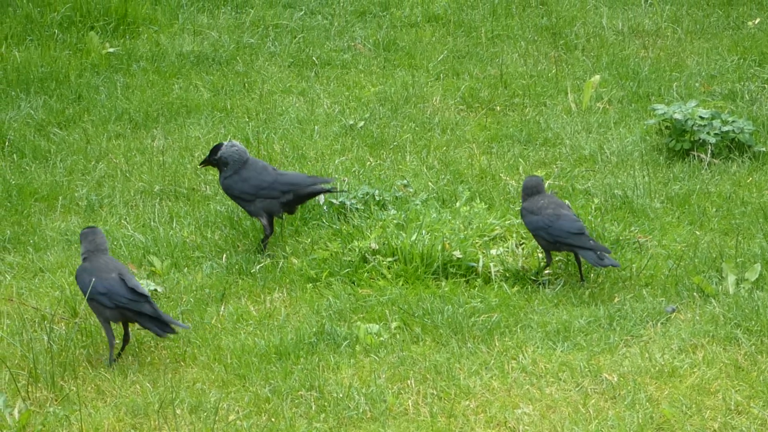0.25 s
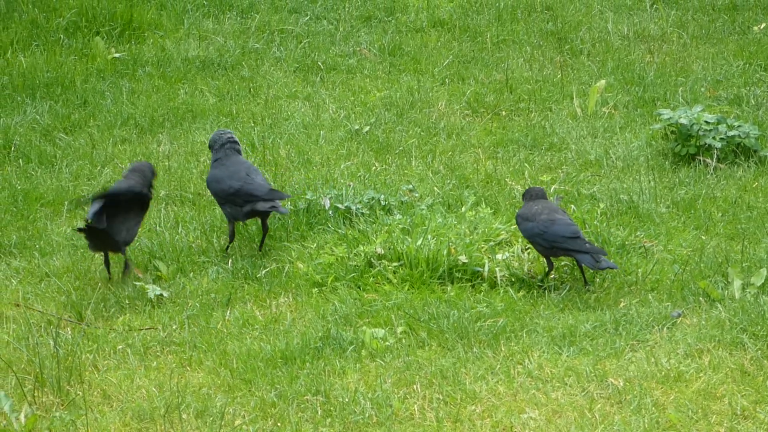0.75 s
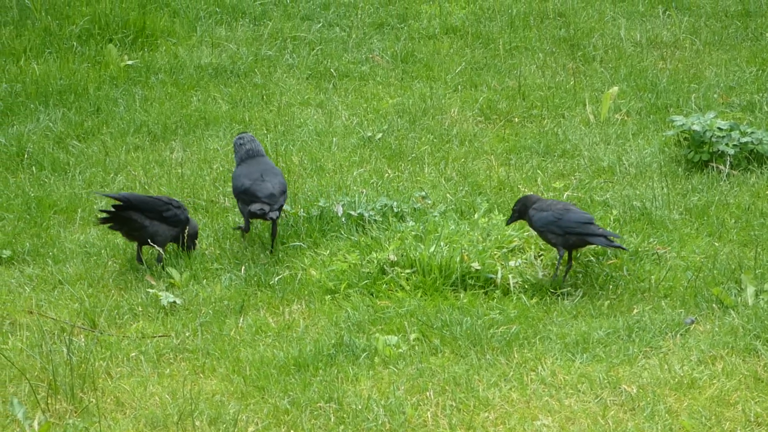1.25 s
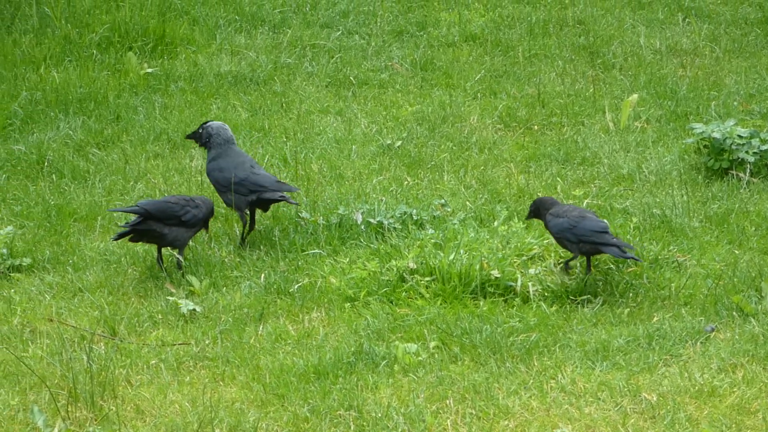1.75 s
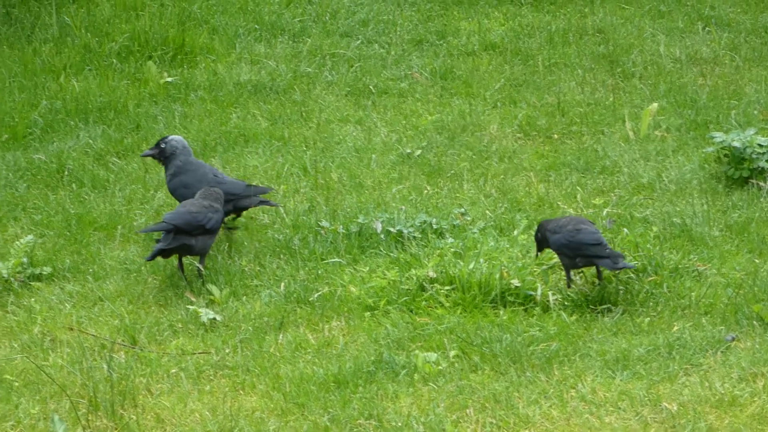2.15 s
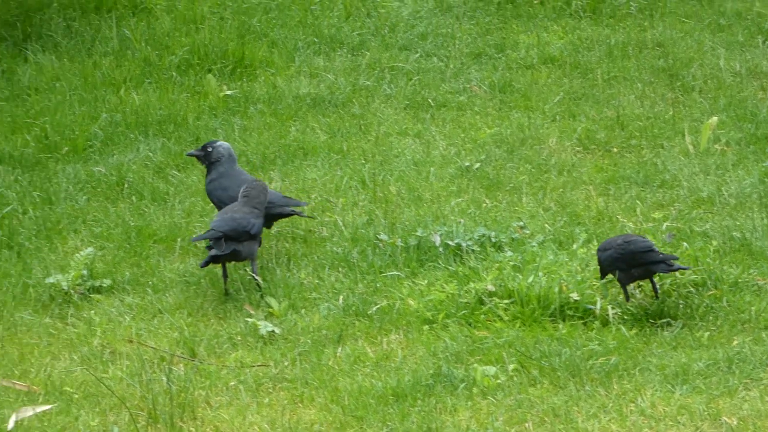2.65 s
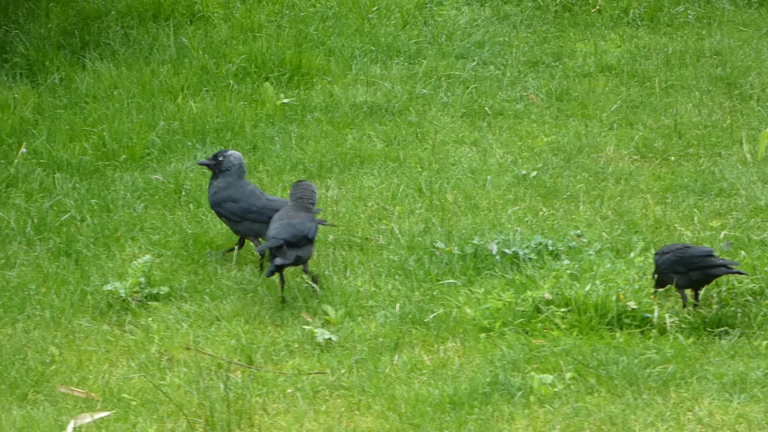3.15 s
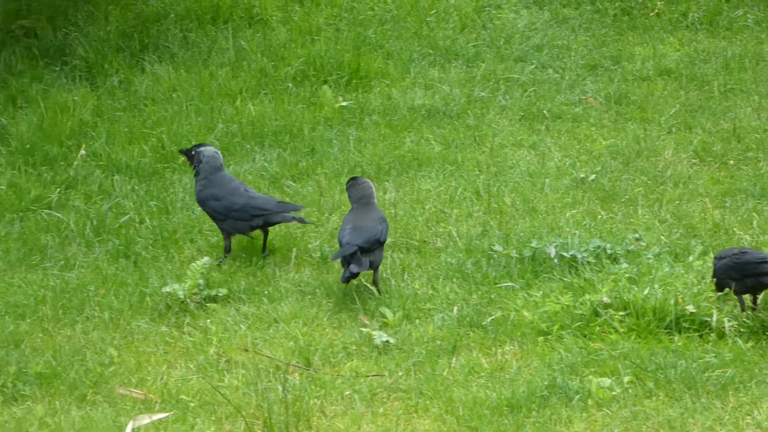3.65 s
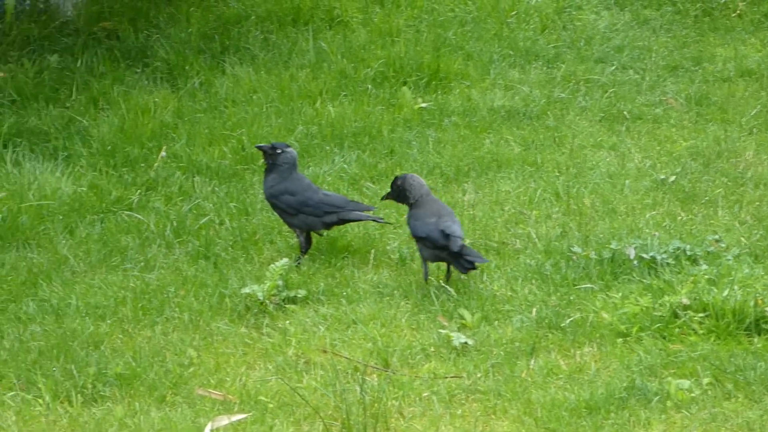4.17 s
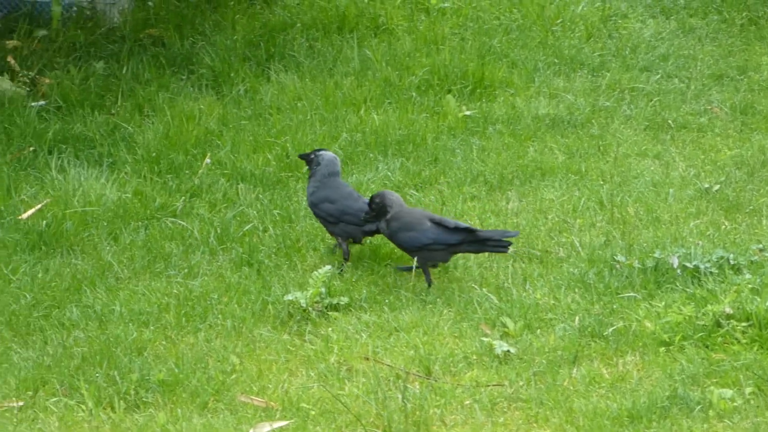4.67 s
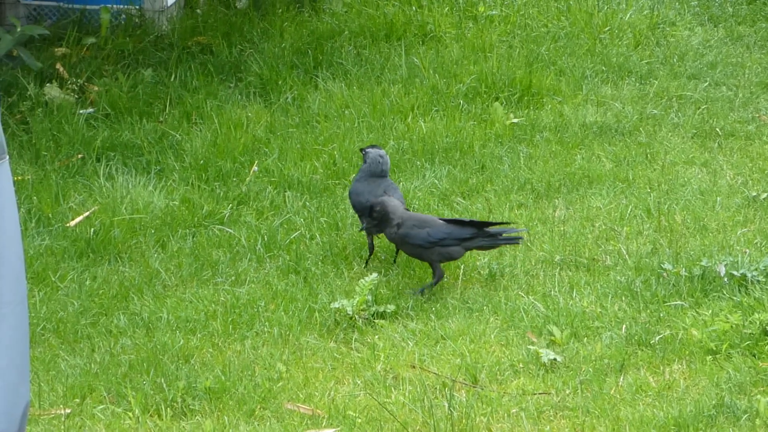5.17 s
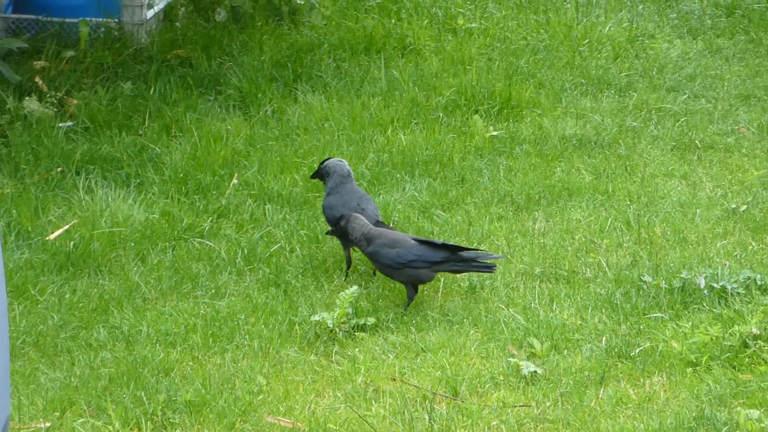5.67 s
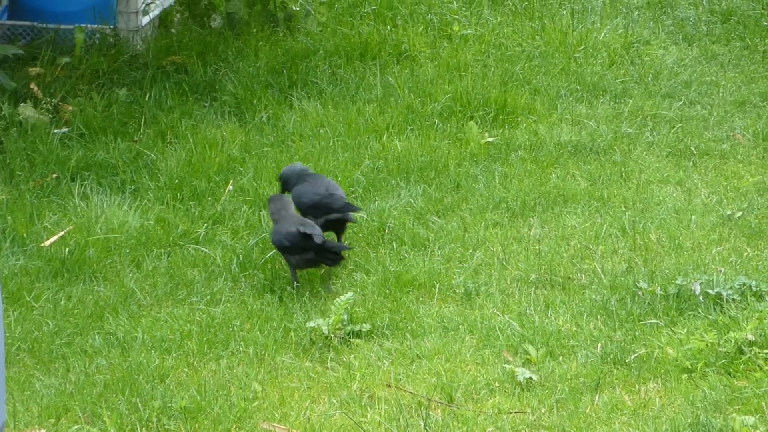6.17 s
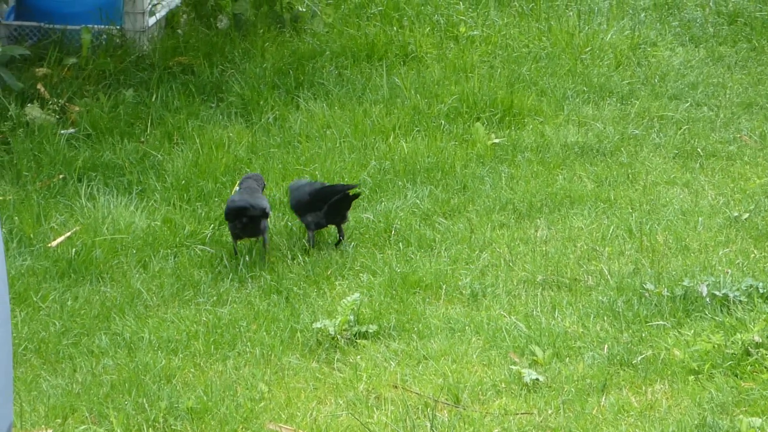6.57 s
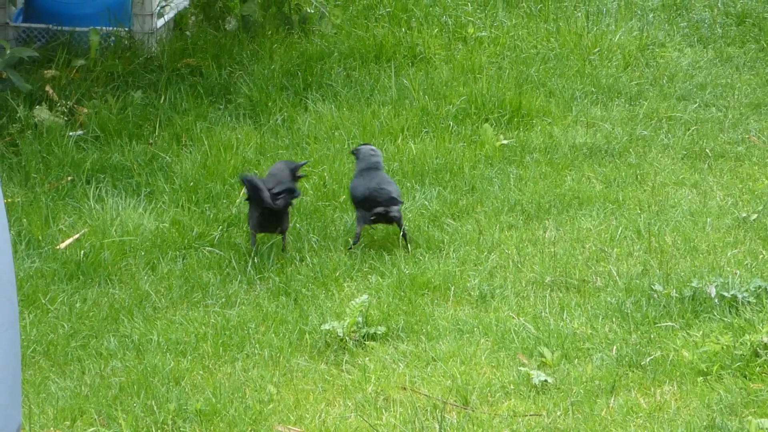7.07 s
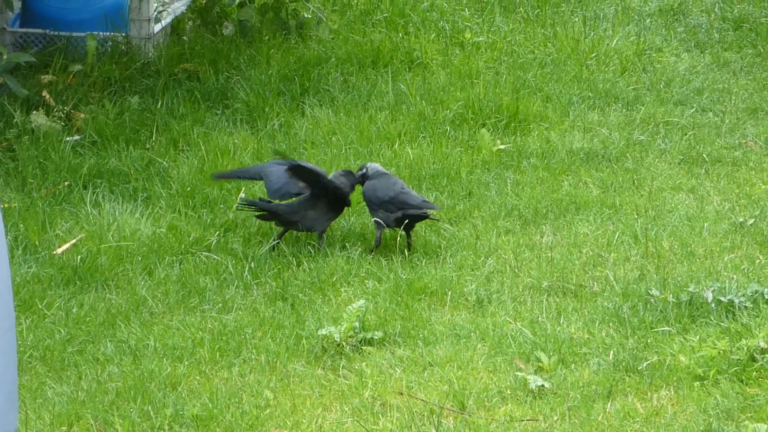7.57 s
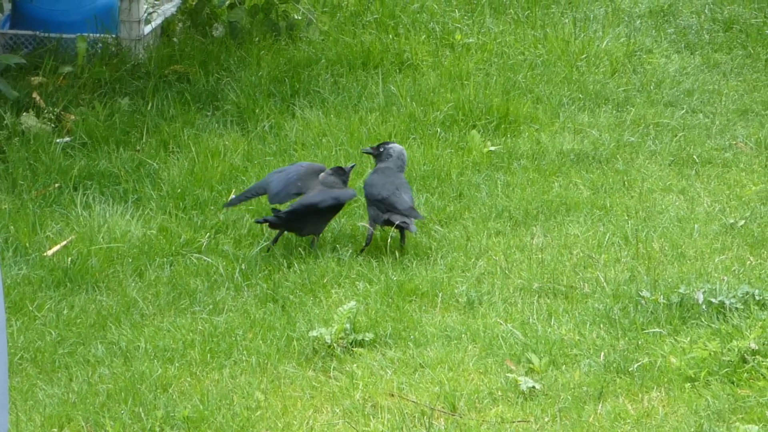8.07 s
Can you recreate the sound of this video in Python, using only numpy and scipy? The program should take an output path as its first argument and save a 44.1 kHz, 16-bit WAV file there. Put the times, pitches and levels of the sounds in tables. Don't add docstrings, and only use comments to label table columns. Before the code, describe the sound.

A garden with faint, slowly swelling far traffic and light hiss throughout. A soft bill snap at 0.1 s and two tiny nasal caws at 0.2 and 0.4 lead into a hidden crow-like bird's chattering phrase from about 0.6: bright pips with quick nasal downward slides, whistles and raspy squeaks, the pip-and-slide pattern returning, then a falling peep and churr. It sounds distant and echoey. A louder snap comes at 1.5 and a clear caw at 1.9; the phrase repeats at 2.1, 3.9 and 5.9. Caws at 3.5 and 3.65 surround another snap; more come at 5.3 and 5.8, with a dull knock and click close by at 5.5. At 7.15 and 7.55 a nearer young jackdaw, slightly right, gives two loud begging calls, breaking and sliding down over an octave, the first with a stronger held start. A weak caw at 8.1 and faint knock at 8.3 finish.

```python
import sys
import numpy as np
from scipy import signal
from scipy.fft import rfft, irfft, next_fast_len
from scipy.io import wavfile

SR = 44100
rng = np.random.default_rng(int(sys.argv[2]) if len(sys.argv) > 2 else 0)


def how_loud(loudness_db):
    steps = np.asarray(loudness_db, float) / 20
    return 10 ** steps


def generate_wav(signal):
    frames = np.transpose(np.atleast_2d(signal))
    scaled = np.clip(frames, -1, 1) * 32767
    pcm = np.round(scaled).astype(np.int16)
    wavfile.write(sys.argv[1], SR, pcm)


N = 367353
TOP_HZ = 15750

# t/s, time stretch, level/dB
PHRASES = [
    (.588, 0.98, -1.5),
    (2.073, 1, -0.56),
    (3.911, .998, -0.87),
    (5.929, 0.99, -0.6),
]
CHEW_STARTS_S = (.152, .765)
# t/s from phrase start, length/s, first f/Hz, last f/Hz, level/dB
WHISTLES = [
    (0.602, 0.042, 3720, 3860, -31),
    (.682, 0.073, 4050, 4150, -39),
    (.664, 0.029, 6650, 6500, -39.5),
    (.479, .032, 3900, 3600, -36),
    (.642, .04, 3600, 3800, -38.5),
]
RASPS = [
    (.001, 0.04, 3050, 2720, -53),
    (0.4804, 0.028, 6700, 6500, -37.5),
    (.49, 0.042, 7300, 6900, -50.5),
    (.481, .068, 10000, 9800, -58),
]
PEEPS = [
    (1.086, 0.061, 2143, 1250, -38.5),
]
CHURRS = [
    (1.112, 0.2, 2293, 584.6, -35),
]
FALLS = [
    (.5, 0.056, 2595, 1153, -43.5),
    (1.12, 0.039, 2130, 1282, -42),
]
TONES = [
    (.055, .066, 3925, 3765, -40),
]
# t/s from chew start, length/s, first f/Hz, last f/Hz, level/dB
CHEW_PIPS = [
    (0.00099, 0.025, 3740, 3950, -28),
    (.026, 0.028, 4000, 3850, -39),
    (.007, 0.028, 3500, 2500, -45),
]
CHEW_SLIDES = [
    (.019, .14, 1270, 725.4, -37.5),
]
CHEW_NASALS = [
    (.195, 0.1084, 559, 593.5, -42.5),
]
CHEW_TAILS = [
    (.085, 0.066, 799, 713, -57.5),
]
# f/Hz, width/Hz, level/dB
SINGER_THROAT = [(710, 130, -7), (1300, 78, 0.5), (3380, 1650, 0.5), (3530, 2400, 6.5), (6300, 600, -16),
                 (9500, 780, -17)]
NASAL_THROAT = [(1180, 750, -10), (2350, 960, -17.5), (3123, 500, 6), (3620, 300, -6), (4020, 190, 4),
                (5400, 1500, -18), (9160, 2400, -20)]
CHURR_THROAT = [(1250, 130, -10), (2060, 850, -14), (3460, 1120, 4.5), (4670, 1400, -2), (5800, 100, -21),
                (10000, 930, -13)]
PEEP_THROAT = [(2100, 700, -3), (4500, 670, 2.5), (6690, 740, 2), (8970, 730, -7.5)]
WHISTLE = dict(slope_db=-18, rough=.05, slide_rough=0.044, glide_s=0.0099,
               attack_s=0.007, sag_db_s=38, release_s=0.021)
RASP = dict(slope_db=-10, rough=0.299, slide_rough=0.018, glide_s=.015,
            attack_s=0.0056, sag_db_s=150, release_s=0.021)
PEEP = dict(slope_db=0.5, rough=.045, slide_rough=.01, glide_s=.052, hesitation=4.5, droop=0,
            attack_s=0.017, sag_db_s=9, release_s=0.027)
CHURR = dict(slope_db=-2.5, rough=0.057, slide_rough=0.142, glide_s=.036,
             attack_s=0.027, sag_db_s=44, release_s=0.0666)
FALL = dict(slope_db=-4.5, rough=0.14, slide_rough=0.11, glide_s=.02,
            attack_s=.014, sag_db_s=20, release_s=0.019)
TONE = dict(slope_db=-17, rough=.032, slide_rough=.02, glide_s=.014,
            attack_s=0.016, sag_db_s=-15, release_s=0.028)
PIP = dict(slope_db=-12, rough=0.09, slide_rough=0.019, glide_s=0.00802,
           attack_s=0.009, sag_db_s=61, release_s=.012)
SLIDE = dict(slope_db=-1, rough=0.078, slide_rough=.06, glide_s=.05, hesitation=3.2,
             attack_s=.012, sag_db_s=117, release_s=0.0091)
NASAL = dict(slope_db=0, rough=0.057, slide_rough=0.014, glide_s=0.0161, droop=0.00214,
             attack_s=0.014, sag_db_s=0, release_s=0.043)
TAIL = dict(slope_db=-13, rough=0.056, slide_rough=.04, glide_s=.015,
            attack_s=0.017, sag_db_s=5, release_s=0.013)


def phrases():
    track = np.zeros(N)
    once = [(WHISTLES, WHISTLE, SINGER_THROAT), (RASPS, RASP, SINGER_THROAT), (PEEPS, PEEP, PEEP_THROAT),
            (CHURRS, CHURR, CHURR_THROAT), (FALLS, FALL, SINGER_THROAT), (TONES, TONE, SINGER_THROAT)]
    chew = [(CHEW_PIPS, PIP, SINGER_THROAT), (CHEW_SLIDES, SLIDE, SINGER_THROAT),
            (CHEW_NASALS, NASAL, NASAL_THROAT), (CHEW_TAILS, TAIL, SINGER_THROAT)]
    for start, stretch, db in PHRASES:
        for shift, parts in [(0, once), (CHEW_STARTS_S[0], chew), (CHEW_STARTS_S[1], chew)]:
            for notes, voice, throat in parts:
                for s, *row in notes:
                    add_voice(track, start + stretch * (shift + s), note(*row, **voice), throat, db)
    return track


# t/s, length/s, f/Hz, starts off pitch by %, level/dB
CAWS = [
    (0.221, 0.054, 466, 5, -53.5),
    (0.417, 0.04, 463, 7.5, -54.5),
    (1.9, 0.1644, 578, -9, -38.5),
    (3.473, .1, 438, -6.5, -45.5),
    (3.654, .215, 549.7, -8, -40.5),
    (5.333, 0.094, 419, -4.5, -47.5),
    (5.789, 0.066, 471, 7.5, -50.5),
    (8.106, 0.094, 386.6, 7, -50),
]
# f/Hz, width/Hz, level/dB
CAW_THROAT = [(1260, 160, -5), (1590, 700, -4), (2820, 920, 6), (3890, 1040, 2.5), (5760, 1200, -20),
              (9500, 2000, -19)]


def lone_caws():
    track = np.zeros(N)
    for s, length, hz, off, db in CAWS:
        slope_db = -2.6 + 0.22 * (db + 44)
        rows = note(length, hz * (1 + off / 100), hz, db, slope_db, rough=.06, slide_rough=0,
                    glide_s=.16 * length, droop=0.00345,
                    attack_s=0.22 * length, sag_db_s=19, release_s=0.506 * length)
        add_voice(track, s, rows, CAW_THROAT)
    return track


# t/s, length/s, level/dB, held note over it/dB
BEGS = [
    (7.161, 0.26, -31, 4.5),
    (7.555, 0.21, -32, -2),
]
# t/s from call start, f/Hz
BEG_PITCH = [
    (0, 1372),
    (.037, 1342),
    (.042, 1160),
    (.076, 993),
    (.092, 768.4),
    (.12, 680.6),
    (.148, 567),
    (.175, 541),
    (.27, 496),
]
# f/Hz, width/Hz, level/dB
YOUNG_THROAT = [(1240, 340, -5), (2070, 470, 9.5), (2560, 700, 8), (4700, 560, -5.5), (5970, 1040, -6),
                (8000, 3000, -17)]


def youngster():
    break_s, break_depth_db, break_heals_s = .041, 6.5, 0.0086
    track = np.zeros(N)
    for s, length, db, held_db in BEGS:
        t = np.arange(0, length, .001)
        push_db = effort(t, length, attack_s=0.035, sag_db_s=19, release_s=0.074)
        held = np.clip((break_s - t) / .003, 0, 1)
        healing = np.exp(-np.abs(t - break_s) / break_heals_s)
        break_db = held * held_db - (1 - held) * break_depth_db * healing
        slope_db = 3.5 + 0.32 * push_db - (4 - 0.53 * held_db) * held
        hz = np.interp(t, *np.transpose(BEG_PITCH))
        rough = .05 + .08 * t
        rows = np.transpose([t, hz, db + push_db + break_db, slope_db, rough])
        add_voice(track, s, rows, YOUNG_THROAT)
    return track


# t/s, level/dB, low knock level/dB
SNAPS = [
    (0.1183, -49, 3),
    (1.5062, -40.5, 15.5),
    (3.5865, -43, 12.5),
]
# f/Hz, width/Hz, level/dB
SNAP_BODY = [(2510, 1700, 0), (5800, 3000, 9.5), (9300, 10000, 8), (14540, 11000, -20)]


def snaps():
    track, t = np.zeros(N), np.arange(600) / SR
    for s, db, knock_db in SNAPS:
        knock_hz, knock_width_hz = SNAP_BODY[0][:2]
        modes = [(knock_hz, knock_width_hz, knock_db)] + list(SNAP_BODY[1:])
        crackle = np.pad(rng.standard_normal(len(t)) * t * np.exp(-t / 0.0052), 200)
        snap = rms_one(coloured(crackle, lambda hz: throat_gain(modes, hz)))
        i = round(s * SR) - 200
        track[i:i + len(snap)] += how_loud(db + 3.0) * snap
    return track


# t/s, f/Hz, length/s, time to fall 60 dB/s, level/dB
BUMPS = [
    (5.513, 355.6, 0.085, 0.28, -46.5),
    (5.528, 14500, .012, 0.022, -43),
    (8.31, 554, 0.022, 0.086, -54.5),
]


def bumps():
    track, t = np.zeros(N), np.arange(6000) / SR
    for s, hz, length, t60, db in BUMPS:
        fade = how_loud(-60 * t / t60)
        shape = fade * np.clip(t / 0.0037, 0, 1) * np.clip((length - t) / 0.0078, 0, 1)
        noise = rng.standard_normal(len(t))
        burst = rms_one(coloured(noise, lambda f: throat_gain([(hz, 0.48 * hz, 0)], f) ** 2))
        i = round(s * SR)
        track[i:i + len(t)] += (how_loud(db) * shape * burst)[:N - i]
    return track


# f/Hz, level/dB per Hz
HUM = [(18, -60), (30, -35), (165, -9.5), (265, -8.5), (294, -3.5), (353, -8), (402, -5.5), (680, -8),
       (736, -7), (1180, -14), (2100, -19.5), (3640, -24.5), (5690, -24), (15800, -36.5)]
HUM_SIDE = [(18, -64), (30, -41), (145, -11.5), (326, -4.5), (392, -6), (424, -5), (796, -9), (1420, -18),
            (1700, -23), (4150, -36.5), (5840, -41), (15800, -48.5)]
# t/s, level/dB
SWELL = [
    (0.0, -64.5),
    (1.51, -62),
    (3.55, -63),
    (3.9, -66),
    (4.41, -62.5),
    (5.84, -67),
    (6.66, -64),
    (8.33, -65.5),
]


def traffic():
    s, rumble_db = np.transpose(SWELL)
    t = np.arange(N) / SR
    white = rng.standard_normal((2, N))
    mid = how_loud(-61.5) * rms_one(coloured(white[0], lambda hz: how_loud(at_hz(HUM, hz))))
    side = how_loud(-52.5) * rms_one(coloured(white[1], lambda hz: how_loud(at_hz(HUM_SIDE, hz))))
    rest, rumble = mid + side * [[1], [-1]], 0
    for edge_hz in [130, 230, 420, 1500]:
        band = coloured(rest, lambda hz: 1 / (1 + (hz / edge_hz) ** 8))
        throb = np.interp(t, np.arange(50) * .17, rng.standard_normal(50))
        rumble = rumble + band * how_loud(2.7 * throb)
        rest = rest - band
    swell_db = np.interp(t, s, rumble_db - np.mean(rumble_db))
    hiss_db = 8 + 0.37 * swell_db
    return rumble * how_loud(swell_db) + rest * how_loud(hiss_db)


EDGE_DB = 24.5


def effort(t, length, attack_s, sag_db_s, release_s):
    rise = np.clip(1 - t / attack_s, 0, 1)
    fall = np.clip(1 - (length - t) / release_s, 0, 1)
    return -EDGE_DB * (rise + fall) - sag_db_s * t


def note(length, first_hz, last_hz, db, slope_db, rough, slide_rough, glide_s, droop=0.00153, hesitation=1, **edges):
    t = np.arange(0, length, .001)
    left = np.exp(-(t / glide_s) ** hesitation)
    hz = last_hz * (first_hz / last_hz) ** left
    release = np.clip(1 - (length - t) / edges["release_s"], 0, 1)
    hz = hz * (1 - droop * EDGE_DB * release)
    level_db = db + effort(t, length, **edges)
    return np.transpose([t, hz, level_db, slope_db + 0 * t, rough + slide_rough * np.sqrt(left)])


def add_voice(track, s, rows, modes, level_db=0):
    at, *columns = np.transpose(rows)
    t = np.arange(at[0], at[-1], 1 / SR)
    hz, db, slope_db, rough = [np.interp(t, at, c) for c in columns]
    white = rng.standard_normal((2, 12000))
    waver = rms_one(signal.lfilter([1], [1, -1.97, .970225], white[0]))[:len(t)]
    flutter = rms_one(signal.lfilter([1], [1, -2.7, 2.43, -.729], white[1]))[:len(t)]
    rough = np.clip(rough, 0, 1)
    hz = hz * (1 + .15 * rough * waver)
    k = np.arange(1, int(TOP_HZ / np.min(columns[0])) + 1)[:, None]
    gains = how_loud(slope_db * np.log2(k)) * throat_gain(modes, k * hz) * (k * hz < TOP_HZ)
    gains = gains / np.sqrt(np.sum(gains ** 2, axis=0) / 2 + 1e-20)
    phase = np.cumsum(2 * np.pi * hz / SR)
    sound = np.sum(gains * np.sin(k * phase), axis=0)
    sound *= how_loud(db + level_db) * (1 + 5.93 * rough * flutter)
    i = round((s + at[0]) * SR)
    track[i:i + len(t)] += sound[:N - i]


# f/Hz, time to fall 60 dB/s
GARDEN_T60 = [(500, 0.45), (1500, 0.47), (3000, 0.46), (6000, 0.4), (12000, 0.41)]


def garden(x, direct_db, rise_s, side_db):
    t = np.arange(round(.7 * SR)) / SR
    edges, echo = 250 * 2 ** np.arange(0, 6.3, .48), 0
    white = rng.standard_normal((2, 2, len(t)))
    for k, (low, high) in enumerate(zip(edges, edges[1:])):
        sos = signal.butter(2, [low, high], "band", fs=SR, output="sos")
        band = signal.sosfilt(sos, white[k % 2])
        t60 = at_hz(GARDEN_T60, np.sqrt(low * high))
        echo = echo + band * how_loud(-60 * t / t60) / np.sqrt(t60)
    echo = echo * (1 - np.exp(-t / rise_s)) * (1 + 0.34 * np.exp(-t / 0.042))
    echo /= np.sqrt(np.sum(echo[0] ** 2))
    echo[0, 0] += how_loud(direct_db)
    mid, side = signal.fftconvolve(x[None], echo, axes=1)[:, :N]
    return mid + how_loud(side_db) * side * [[1], [-1]]


def rms_one(x):
    return x / np.sqrt(np.mean(x ** 2) + 1e-20)


def at_hz(points, hz):
    point_hz, value = np.transpose(points)
    return np.interp(np.log(hz), np.log(point_hz), value)


def throat_gain(modes, hz):
    power = 0
    for mid_hz, width_hz, db in modes:
        power = power + how_loud(2 * db) / (1 + (2 * (hz - mid_hz) / width_hz) ** 2) ** 2
    return np.sqrt(power)


def coloured(x, gain_at):
    size = next_fast_len(x.shape[-1])
    hz = np.maximum(np.arange(size // 2 + 1) * SR / size, 1)
    return irfft(rfft(x, size) * gain_at(hz), size)[..., :x.shape[-1]]


def scene():
    far = garden(phrases() + lone_caws(), direct_db=-11, rise_s=0.00073, side_db=-11.5)
    bills = garden(snaps(), direct_db=-7, rise_s=0.00093, side_db=-6.5)
    near = garden(youngster(), direct_db=1.5, rise_s=0.00077, side_db=-6.0)
    near = near * how_loud([[-.6], [.6]])
    return far + bills + near + bumps() + traffic()


def top_cut(x):
    return signal.sosfilt(signal.butter(12, 15970, fs=SR, output="sos"), x)


def record(dry):
    notch_hz, width_hz, depth = 7920, 255, 0.49

    def microphone(hz):
        dip = depth / (1 + (2 * (hz - notch_hz) / width_hz) ** 2)
        return (1 - dip) * (hz < TOP_HZ)

    mix = coloured(dry, microphone)
    return top_cut(mix)


dry = scene()
out = record(dry)
generate_wav(out)
```